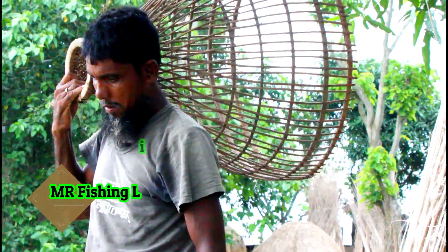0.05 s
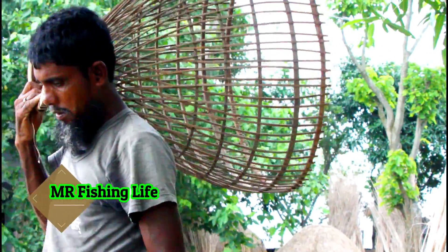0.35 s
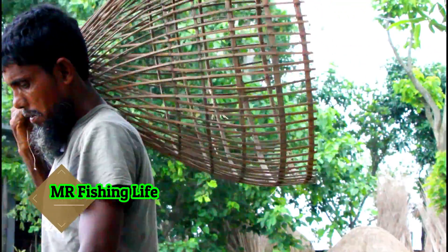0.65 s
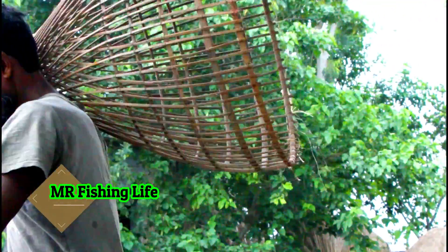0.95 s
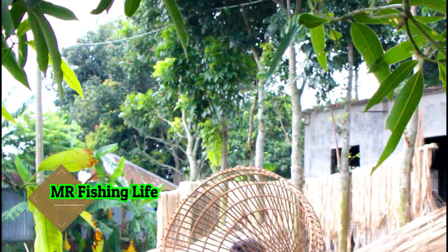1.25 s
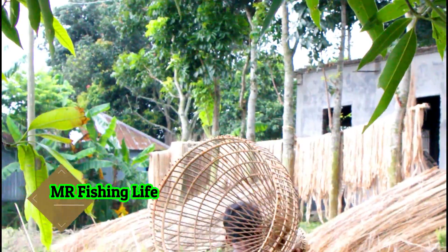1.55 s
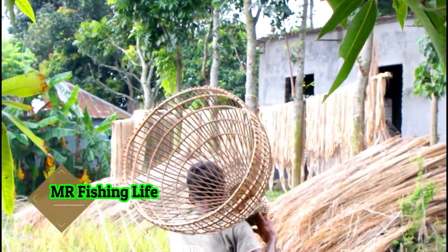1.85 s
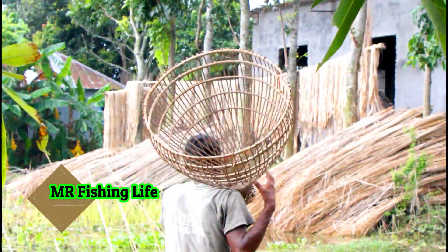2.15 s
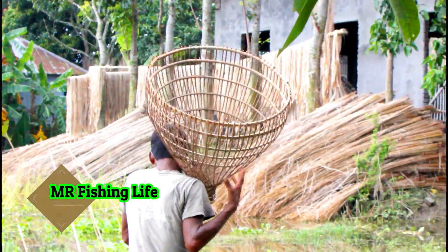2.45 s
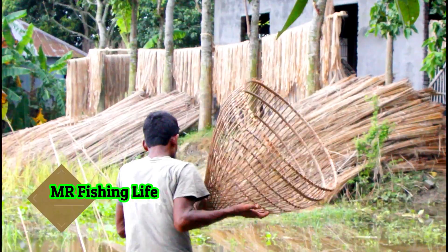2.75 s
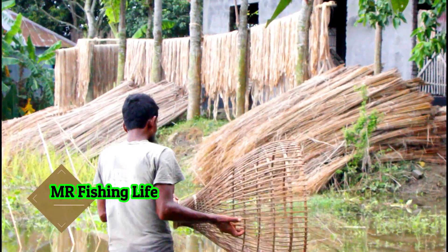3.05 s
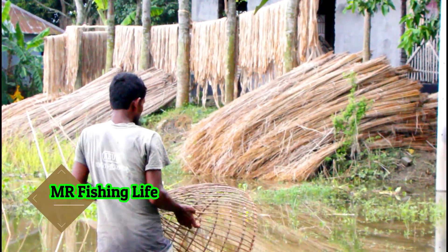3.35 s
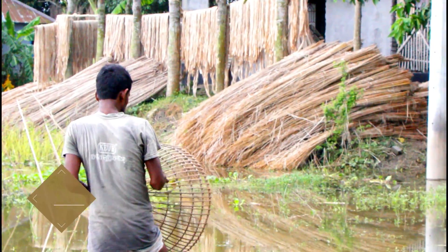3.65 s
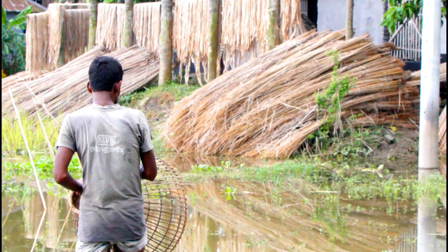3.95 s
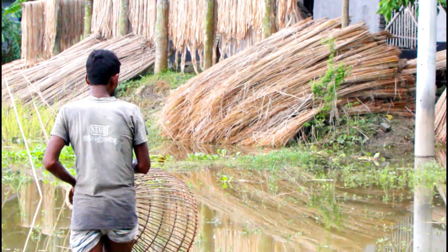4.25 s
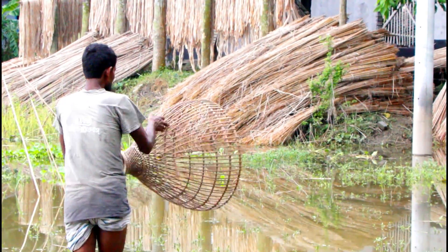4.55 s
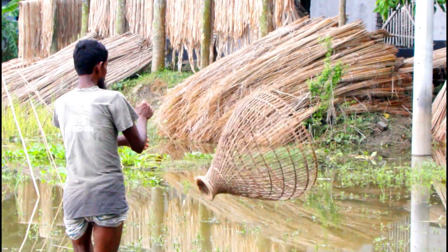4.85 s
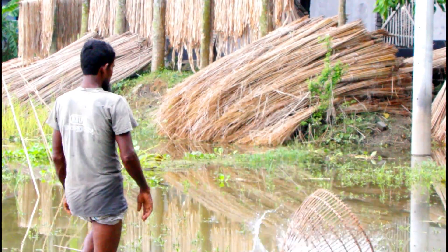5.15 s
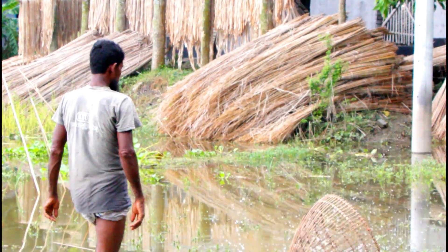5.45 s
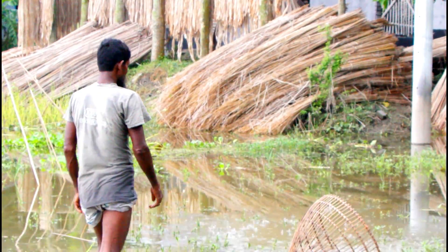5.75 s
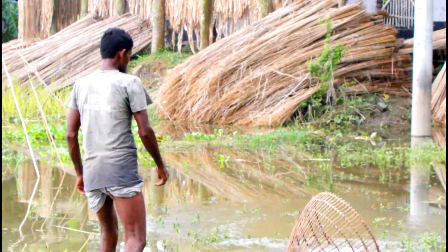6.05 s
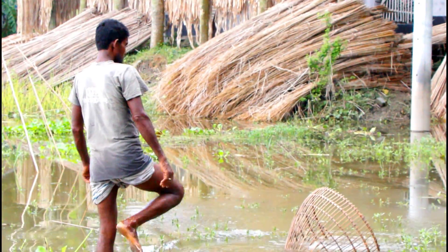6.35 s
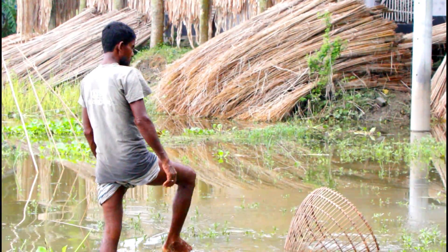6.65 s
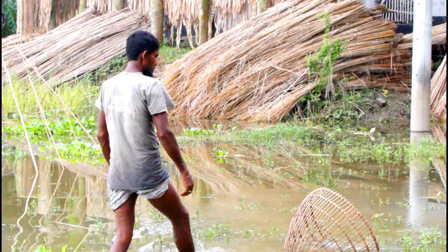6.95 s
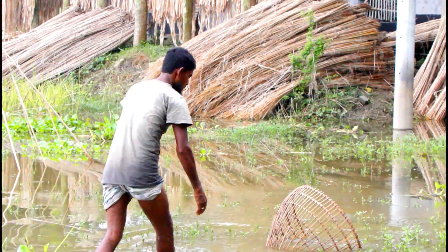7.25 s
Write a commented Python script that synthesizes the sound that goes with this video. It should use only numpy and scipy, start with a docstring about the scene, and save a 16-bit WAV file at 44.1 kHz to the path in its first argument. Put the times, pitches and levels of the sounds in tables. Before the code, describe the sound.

Legs slosh through shallow water and a bamboo fish trap lands with a broad splash, while a crow caws and small birds whistle.

```python
"""Fish trap in shallow floodwater

In front of the microphone a man wades in, legs sloshing and shedding bubbles, spray hissing, with one
sharp snap early on. He throws a bamboo fish trap, which lands with a broad splash. Some way off a crow
caws four times and small birds whistle; trees and house walls scatter the calls back."""
import sys
import numpy as np
from scipy import signal
from scipy.fft import rfft, irfft
from scipy.io import wavfile
from scipy.ndimage import uniform_filter1d, map_coordinates

SR = 44100
rng = np.random.default_rng(int(sys.argv[2]) if len(sys.argv) > 2 else 0)


def waveform_to_disk(signal):
    """Save audio, clipped to [-1, 1], as 16-bit WAV at the path in sys.argv[1]."""
    frames = np.transpose(np.atleast_2d(signal))
    scaled = np.clip(frames, -1, 1) * 32767
    samples = np.round(scaled).astype(np.int16)
    wavfile.write(sys.argv[1], SR, samples)


N = 326340
TIME = np.arange(N) / SR

# The trap's splash: the rim slaps, the cavity collapses, it gulps shut, thrown water rains back.
# Each row: start, rise, hold and fall in seconds, then relative body, gulp and spray levels in dB.
SPLASH_STAGES = [(5.13, 0.027, 0.008, 0.04, -40.5, -76, -61),
                 (5.215, 0.069, 0.17, 0.084, -44.5, -48, -57.5),
                 (5.337, .03, 0.0092, 0.015, -55, -47, -60.5), (5.464, 0.11, 0.032, 0.051, -45, -56, -53)]
# Spectra of moving water. Each row: frequency in Hz, level in dB.
SPLASH_BODY_SPECTRUM = [(350, -36.5), (650, -31.5), (950, 4), (1500, 1.5), (2000, 4), (2800, -4.5),
                        (4200, -8.5), (6000, -18.5), (10000, -21.5)]
GULP_SPECTRUM = [(60, -15.5), (150, -21.5), (280, -12.5), (450, -13.5), (650, -0.5), (900, 4), (1200, -6.5),
                 (1800, -37)]
SLOSH_SPECTRUM = [(200, -21.5), (450, -26), (700, -11.5), (1050, 2), (1500, -1.5), (2000, -7.5), (2900, -9),
                  (4800, -23.5), (7000, -20), (11000, -33.5), (17000, -41)]
SPRAY_SPECTRUM = [(1200, -30.5), (2200, -10.5), (3000, 4.5), (4200, 2.5), (5600, 4.5), (7200, -2.5),
                  (10000, -13.5), (14000, -19), (18000, -25)]
MIST_SPECTRUM = [(3000, -19), (5000, -7), (6500, 2), (9000, -0.5), (13000, -3), (18000, -10.5)]
# A leg pushes water. Each row: start in seconds, relative level in dB, hold and settling in seconds.
STRIDE_PUSHES = [(0.745, -71.5, .01, 0.033), (1.135, -61.5, .02, 0.039), (1.212, -57, .07, 0.03),
                 (1.323, -62.5, .06, .025), (1.885, -61, .02, .04), (1.968, -61, .03, 0.12),
                 (2.356, -65.5, .005, 0.026), (3.21, -56.5, .27, .035), (3.97, -57, 0.15, 0.02),
                 (4.864, -67, .02, .1), (5.883, -72, .01, 0.022), (6.218, -68.5, .12, 0.018),
                 (6.462, -73.5, .01, 0.036)]
# The hollow gulp of a foot sinking in. Each row: start in seconds, level in dB.
FOOT_GULPS = [(3.211, -27)]
# The course of that gulp. Each row: age in seconds, pitch in Hz, relative level in dB.
FOOT_CONTOUR = [(0, 604, -30), (.006, 814, -19.5), (.01, 1140, -8), (0.016, 1050, -22), (0.034, 886, -47.5)]
# Larger single bubbles. Each row: start in seconds, peak in dB, starting pitch in Hz.
BIG_BUBBLES = [(1.225, -42, 1260), (1.244, -37, 2750), (1.259, -42, 1900), (1.273, -44.5, 1152),
               (1.286, -45.5, 1620), (1.375, -42.5, 1083), (1.973, -45.5, 1108), (2.031, -47.5, 1270),
               (2.179, -51.5, 1240), (2.222, -45, 1820), (2.32, -47.5, 1606), (2.514, -36, 1530),
               (3.242, -37.5, 1320), (3.293, -44, 1030), (3.332, -45.5, 976), (3.358, -53.5, 660),
               (3.402, -47.5, 1010), (3.466, -44.5, 1260), (3.484, -40, 1450), (3.485, -40, 2940),
               (4.001, -41, 1030), (4.089, -48.5, 1030), (4.114, -44.5, 946), (4.116, -48.5, 2370),
               (4.569, -52, 2514), (5.05, -45, 2340), (5.418, -30.5, 2140), (5.701, -41, 1083),
               (6.232, -43, 2220), (6.278, -51, 2110), (6.333, -54.5, 1220), (6.482, -49, 2090)]
# Sheets of spray. Each row: start in seconds, level in dB, rise and fall in seconds, mist share in dB.
SPRAY_SHEETS = [(0.771, -62, 0.027, 0.039, 1), (1.151, -65, 0.036, 0.057, -24),
                (1.225, -66, 0.062, 0.029, -28), (1.412, -72.5, 0.0081, 0.026, -19),
                (1.946, -64, 0.065, .13, -9.5), (2.367, -51, 0.004, 0.016, -3),
                (3.219, -73, 0.0036, 0.19, -0.5), (3.476, -66, 0.0034, 0.079, -15),
                (3.94, -72.5, 0.0078, 0.12, -0.5), (4.402, -80, 0.0047, 0.06, 14),
                (4.82, -78.5, 0.048, 0.099, 0.5), (5.125, -38.5, 0.02, 0.028, -7),
                (5.821, -46, 0.0021, 0.03, 0), (6.222, -67.5, .008, 0.063, -26),
                (6.475, -62, 0.024, 0.057, -19)]
# Single drops striking the water. Each row: start in seconds, level in dB, pitch in Hz.
DROPS = [(1.225, -45, 4350), (1.365, -48.5, 2990), (1.404, -56.5, 3400), (1.893, -47, 4180),
         (2.197, -52.5, 3900), (2.37, -41.5, 5220), (2.417, -50, 4600), (3.39, -54, 4500),
         (3.414, -52.5, 4630), (3.619, -52, 7300), (4.034, -58.5, 3900), (5.824, -43, 3000),
         (6.131, -57.5, 2200), (6.931, -55.5, 6250)]
# A drop's spectrum. Each row: multiple of its pitch, level in dB.
DROP_SPECTRUM = [(.3, -28), (.8, -14), (1, 0), (1.2, -14), (2.5, -38)]
# The snap and its quick rebounds. Each row: start in seconds, relative level in dB.
SNAP_HITS = [(1.1422, -2.5), (1.1447, -11), (1.1464, -12), (1.1491, -23)]
# What the snap rings with. Each row: frequency in Hz, relative level in dB, seconds to fall 60 dB.
SNAP_RESONANCES = [(1610, -36, 0.0081), (2298, -7, 0.00852), (2590, -2.5, 0.007), (4300, -6, 0.003),
                   (5455, -16.5, 0.0028), (8724, -33, 0.0029)]

# The crow's calls. Each row: start and length in seconds, relative level and crescendo in dB, throat
# resonance at the start and at the top of its arch in Hz, seconds to that top, resonance at the end in
# Hz, pulse rate in Hz with the throat at rest, period jitter as a fraction, beak and clear tones in dB.
CROW_CALLS = [(0.241, 0.44, -45, -2.5, 1558, 1917, .12, 1868, 87.96, 0.09, -21, -14.5),
              (1.575, 0.39, -51, 7, 1660, 1825, .15, 1741, 150.6, 0.04, -30.5, -26.5),
              (2.451, 0.4, -48.5, -0.5, 1530, 1856, .26, 1855, 159.5, .08, -26.5, -33),
              (3.684, 0.38, -46, 1, 1808, 1870, 0.11, 1836, 142.1, 0.09, -23.5, -42)]
# The crow's throat at rest and the beak's upper resonances. Each row: frequency in Hz, level in dB.
THROAT_SPECTRUM = [(300, -45), (600, -37.5), (950, -16), (1350, -6.5), (1650, -3), (1850, 10.5), (2100, 4),
                   (2400, -12.5), (3100, -57.5), (4000, -74)]
BEAK_SPECTRUM = [(3000, -20.5), (3700, -30), (4400, 3.5), (5300, -8), (6400, -2), (7800, -13), (9000, -23),
                 (12000, -29.5)]
# Clear tones under a caw. Each row: multiple of the base pitch, relative level in dB.
CLEAR_TONES = [(0.998, 1), (1.075, -4), (1.409, -2), (1.7, -8)]
# A dull, low swell during the first caw. Each row: frequency in Hz, level in dB.
LOW_SWELL_SPECTRUM = [(50, -18), (80, -1), (160, -2), (300, -6), (480, 7), (750, 5), (1200, -4)]
# A two-note song. Each row: start in seconds, relative level of the falling note in dB, seconds until
# the rising note, its relative level in dB.
SONG_PHRASES = [(0.091, -56, .22, -47), (0.466, -48.5, 0.24, -48.5), (0.854, -52.5, 0.23, -49),
                (4.492, -59.5, 0.23, -55), (4.871, -52.5, 0.2, -50.5), (5.243, -53, 0.24, -46),
                (5.599, -47, 0.25, -50), (5.983, -50, .216, -50.5), (6.334, -49, 0.23, -51.5),
                (6.703, -52.5, 0.24, -54), (7.078, -56, 0.25, -55.5)]
# Arched chips, and hoarse chirps from further off. Each row: start in seconds, relative level in dB.
CHIPS = [(4.948, -51), (5.425, -43), (5.578, -43), (5.864, -45), (6.018, -45), (6.302, -45), (6.452, -44),
         (6.725, -46), (6.876, -48), (7.175, -54.5), (7.339, -51)]
DISTANT_CHIRPS = [(1.16, -50), (1.485, -62.5), (1.832, -53), (2.14, -54.5), (2.468, -54.5), (2.775, -56.5)]
# The course of each bird note. Each row: age in seconds, pitch in Hz, relative level in dB.
FALL_CONTOUR = [(0, 3740, -15), (.006, 3230, -5.5), (0.021, 3005, -4), (0.029, 2900, 0.5),
                (0.045, 2640, -6), (0.064, 2500, -20), (0.101, 2110, -21), (0.114, 1970, -45)]
RISE_CONTOUR = [(0, 3600, -17), (.008, 4250, -4), (.016, 4850, 0), (.024, 5350, -4), (.032, 5450, -11),
                (.05, 4600, -30)]
CHIP_CONTOUR = [(0, 2500, -11), (.008, 2900, -5), (.016, 3550, -3), (.024, 3950, -2), (.032, 3900, -2),
                (.041, 3550, -4), (.062, 2200, -20)]
DISTANT_CONTOUR = [(0, 3330, -8), (.015, 3446, -8), (0.034, 3882, -2.5), (.05, 4200, -7.5),
                   (0.062, 4365, -7)]
# Spectra of a soft click, the open air and an insect. Each row: frequency in Hz, level in dB.
CLICK_SPECTRUM = [(30, 10.5), (150, -0.5), (500, -12), (2000, 2), (6000, -6.5), (16000, -25)]
AIR_SPECTRUM = [(18, -39), (30, -3.5), (102, 2.5), (208, -5.5), (705, -2.5), (1200, -6.5), (1780, -10),
                (2520, -13.5), (3750, -14.5), (5290, -18.5), (9240, -12), (17000, -14.5)]
INSECT_SPECTRUM = [(8000, -33.5), (8800, -7), (9250, 2), (9700, -12), (10500, -25)]

THROAT_REST_HZ, CAW_ATTACK_S, CAW_RELEASE_S = 1850, 0.1, 0.15


def trap_splash():
    """The rim slaps the surface, the cavity gulps shut and the thrown water rains back."""
    stages = np.array([envelope(*row[:4]) for row in SPLASH_STAGES])
    body, gulp, spray = undb(np.array(SPLASH_STAGES)[:, 4:]).T @ stages
    churn = colour(froth(cycles=5, spread_db=3.5, crackle_db=3, count=10000), SPLASH_BODY_SPECTRUM)
    gurgle = colour(froth(cycles=9, spread_db=4.5, crackle_db=-4, count=3500), GULP_SPECTRUM)
    rain = undb(0.5) * colour(patter(6400, spread_db=1), SPRAY_SPECTRUM)
    return body * churn + gulp * gurgle + spray * rain


def wading():
    """Each stride folds air into the water, and one foot gulps as it sinks in."""
    sag_db_per_s = 32.5  # a push weakens as the leg slows
    push = np.zeros(N)
    for start, db, hold, settle in STRIDE_PUSHES:
        sag_db = sag_db_per_s * np.clip(TIME - start, 0, hold)
        push += undb(db - sag_db) * envelope(start, rise=0.013, hold=hold, fall=settle)
    bubbles = froth(cycles=12, spread_db=6, crackle_db=0.5, count=5000)
    slosh = undb(1.5) * push * colour(bubbles, SLOSH_SPECTRUM)
    return slosh + glides(FOOT_GULPS, FOOT_CONTOUR, waver=0.12, flutter_db=1)


def plops():
    """Larger single bubbles ring for about the same time whatever their size, each with a spatter."""
    out, t = np.zeros(N), TIME[:SR // 10]
    ring_s = 0.003
    spatter_gain = np.exp(-t / 0.0095) * np.minimum(t / 0.0014, 1)
    for start, db, hz in BIG_BUBBLES:
        spatter = spatter_gain * colour(rng.standard_normal(len(t)), SLOSH_SPECTRUM)
        add(out, start - 0.001, undb(db) * bubble(hz, cycles=ring_s * hz, glide=0.1, onset=2.2))
        add(out, start, undb(db - 20) * spatter)
    return out


def sprays():
    """Sheets of small droplets burst up in clumps and thin out."""
    clumps = undb(2.5 * walk(90, N))
    coarse = colour(patter(4000, spread_db=3.8) * clumps, SPRAY_SPECTRUM)
    mist = colour(patter(3000, spread_db=2.9) * clumps, MIST_SPECTRUM)
    return sum(undb(db) * envelope(start, rise, 0, fall) * (coarse + undb(mist_db) * mist)
               for start, db, rise, fall, mist_db in SPRAY_SHEETS)


def drop_ticks():
    """Single drops strike the water: each a tiny burst of noise around one pitch."""
    out, t = np.zeros(N), TIME[:SR // 20]
    rise_s, fall_s = 0.0015, 0.0032
    gain = np.minimum(t / rise_s, 1) ** 2 * np.exp((rise_s - t) / fall_s)
    for start, db, hz in DROPS:
        spectrum = [(hz * ratio, band_db) for ratio, band_db in DROP_SPECTRUM]
        add(out, start, undb(db) * gain * colour(rng.standard_normal(len(t)), spectrum))
    return out


def froth(cycles, spread_db, crackle_db, count):
    """A cloud of bubbles of all sizes among bursting droplets."""
    cloud = np.zeros(N)
    for when, pitch_draw, level_draw in rng.random((count, 3)):
        hz = 330 * 13 ** pitch_draw
        gain = hz * undb(-spread_db * np.log(level_draw + 0.054))
        add(cloud, when * N / SR, gain * bubble(hz, cycles, glide=0.14, onset=0.71))
    return unit(cloud) + undb(crackle_db) * patter(2300, spread_db=1.8)


def bubble(hz, cycles, glide, onset):
    """A bubble swells over `onset` cycles, rings down and rises in pitch."""
    turns = np.arange(int(4 * cycles * SR / hz) + 2) * hz / SR
    ring = np.exp(-turns / cycles) * (1 - np.exp(-(turns / onset) ** 2))
    return ring / ring.max() * np.sin(2 * np.pi * turns * (1 + glide * turns / (8 * cycles)))


def patter(per_second, spread_db):
    """Tiny impacts of unequal size, as of droplets, each with a brief fizz."""
    hits = rng.random(N) < per_second / SR
    impacts = hits * undb(spread_db * np.minimum(rng.exponential(size=N), 4))
    fizz_gain = signal.lfilter([1], [1, -np.exp(-1 / (0.00024 * SR))], impacts)
    return unit(fizz_gain * rng.standard_normal(N))


def snap():
    """A hard, dry snap, perhaps of bamboo, rings for a few milliseconds; too small to radiate bass."""
    out, t = np.zeros(N), TIME[:SR // 20]
    ring = sum(undb(db) * np.sin(2 * np.pi * hz * t) * np.exp(-np.log(1000) * t / t60)
               for hz, db, t60 in SNAP_RESONANCES)
    for start, db in SNAP_HITS:
        add(out, start, undb(db) * ring * (1 - np.exp(-t / 0.00038)))
    return signal.sosfilt(signal.butter(2, [1000, 11000], "band", fs=SR, output="sos"), out)


def click():
    """A soft, full-range click just before the snap."""
    gain = undb(-48.5) * envelope(1.119, rise=0.00038, hold=0.00061, fall=0.00078)
    return gain * colour(rng.standard_normal(N), CLICK_SPECTRUM)


def crow():
    """Four caws from a tree some way off, more echo than direct sound at the microphone."""
    direct = np.zeros(N)
    for start, *settings in CROW_CALLS:
        add(direct, start, caw(*settings))
    return undb(-5.5) * direct + undb(2.5) * scatter(direct, t60=0.13, gap=0.004, patchy_db=3.26)


def caw(length, db, crescendo_db, start_hz, top_hz, top_s, end_hz, pulse_hz, jitter, beak_db, tone_db):
    """The crow's effort builds, holds and lets go; pitch and resonances arch together with the throat."""
    voice = crow_voice(pulse_hz, jitter, beak_db, tone_db)
    age = TIME[:SR // 2]
    starting = np.maximum(1 - age / CAW_ATTACK_S, 0) ** 2
    ending = np.maximum(1 + (age - length) / CAW_RELEASE_S, 0) ** 2
    held = np.clip((age - CAW_ATTACK_S) / (length - CAW_ATTACK_S - CAW_RELEASE_S), 0, 1)
    effort_db = db + crescendo_db * (held - 0.5) - 19 * starting - 25.5 * ending
    before_top = np.maximum(1 - age / top_s, 0)
    after_top = np.clip((age - top_s) / (length - top_s), 0, 1)
    throat_hz = top_hz + (start_hz - top_hz) * before_top ** 2 + (end_hz - top_hz) * after_top
    arched = map_coordinates(voice, [np.cumsum(throat_hz / THROAT_REST_HZ)], order=3)
    return undb(effort_db) * np.minimum(age / 0.03, 1) * unit(arched)


def crow_voice(pulse_hz, jitter, beak_db, tone_db):
    """Harsh, uneven pulses ring the crow's throat, over clear low tones that sag."""
    age, t = TIME[:SR], TIME[:SR // 40]
    timing, strength = rng.standard_normal((200, 2)).T
    at = (np.cumsum(np.abs(1 + jitter * timing)) * SR / pulse_hz).astype(int)
    inside = at < SR
    pulses = np.zeros(SR)
    pulses[at[inside]] = undb(4.5 * np.clip(strength[inside], -1.5, 1.5))
    # the membranes stay open for a few milliseconds and let rasping air through
    opening = t * np.exp(-t / 0.0013)
    airflow = signal.lfilter(opening, 1, pulses)
    rasp = unit(airflow * rng.standard_normal(SR))
    ring = unit(signal.lfilter(opening * np.sin(2 * np.pi * THROAT_REST_HZ * t), 1, pulses))
    throat = ring + undb(-3.5) * colour(rasp + 0.5 * unit(pulses), THROAT_SPECTRUM)
    # the upper resonances come in as the beak opens
    beak = np.minimum(age / CAW_ATTACK_S, 1) ** 2 * colour(rasp, BEAK_SPECTRUM)
    turns = np.cumsum(np.interp(age, [0, 0.17, 0.36], [890, 895, 820])) / SR
    tones = sum(undb(db) * np.sin(2 * np.pi * ratio * turns) for ratio, db in CLEAR_TONES)
    return throat + undb(beak_db - 1) * beak + undb(tone_db) * tones


def low_swell():
    """A dull, low swell during the first caw: faint at first, then briefly louder."""
    lead_in = undb(-85) * envelope(0.27, rise=0.051, hold=0.24, fall=0.05)
    peak = undb(-61) * envelope(0.506, rise=0.068, hold=0.03, fall=0.03)
    return (lead_in + peak) * colour(patter(2500, spread_db=2.8), LOW_SWELL_SPECTRUM)


def small_birds():
    """One bird alternates falling and rising notes, another chips, a third rasps deep in the trees."""
    falling_notes = [(start, db) for start, db, _, _ in SONG_PHRASES]
    rising_notes = [(start + delay, db) for start, _, delay, db in SONG_PHRASES]
    falls = glides(falling_notes, FALL_CONTOUR, waver=0.027, flutter_db=2.5)
    rises = glides(rising_notes, RISE_CONTOUR, waver=0.035, flutter_db=3)
    chips = glides(CHIPS, CHIP_CONTOUR, waver=0.055, flutter_db=3.5, waver_hz=800)
    distant = glides(DISTANT_CHIRPS, DISTANT_CONTOUR, waver=0.11, flutter_db=4, waver_hz=1100)
    direct = undb(-1.5) * falls + undb(-7) * rises + undb(-3) * chips
    into_trees = undb(-7.5) * falls + undb(-5.5) * (rises + chips) + undb(-1) * distant
    early = scatter(into_trees, t60=0.2, gap=0.0043, patchy_db=1.6)
    late_low = scatter(undb(-6.5) * falls, t60=0.48, gap=0.011, patchy_db=3.5)
    # leaves swallow more of the higher notes
    high_notes = undb(-13.5) * rises + undb(-15) * chips + undb(-22) * distant
    late_high = scatter(high_notes, t60=0.48, gap=0.018, patchy_db=5)
    return direct + early + late_low + late_high


def glides(calls, contour, waver, flutter_db, waver_hz=450):
    """Gliding tones that waver in pitch and strength, each its own way; fast wavering sounds hoarse."""
    ages, hz, db = np.transpose(contour)
    t = np.arange(int(ages[-1] * SR)) / SR
    smooth_hz = uniform_filter1d(np.interp(t, ages, hz), size=200)
    fade = signal.windows.tukey(len(t), 0.1)
    out = np.zeros(N)
    for start, call_db in calls:
        pitch = smooth_hz * (1 + waver * walk(waver_hz, len(t)))
        gain = fade * undb(call_db + np.interp(t, ages, db) + flutter_db * walk(320, len(t)))
        add(out, start, np.sqrt(2) * gain * np.sin(2 * np.pi * np.cumsum(pitch) / SR))
    return out


def insect():
    """A thin, uneven trill runs faintly throughout and swells once."""
    trill = colour(rng.standard_normal(N), INSECT_SPECTRUM) * undb(2.6 * walk(27, N))
    effort = undb(-103) + undb(-87) * envelope(3.6, rise=0.69, hold=0.37, fall=0.3)
    return effort * trill


def open_air():
    """Very quiet open air that wavers and slowly grows quieter."""
    level_db = -85.5 - 0.43 * TIME + walk(2.6, N)
    return undb(level_db) * colour(rng.standard_normal(N), AIR_SPECTRUM)


def scatter(x, t60, gap, patchy_db):
    """Many unequal echoes from trunks, leaves and walls, setting in after `gap` seconds."""
    t = TIME[:SR]
    echoes = rng.standard_normal(SR) * undb(patchy_db * rng.standard_normal(SR))
    echoes *= np.exp(-np.log(1000) * t / t60) * np.clip(t / gap - 1, 0, 1)
    return signal.fftconvolve(x, echoes / np.sqrt(np.sum(echoes ** 2)))[:N]


def envelope(start, rise, hold, fall):
    """Gain that rises, holds and dies away with the time constant `fall`, all in seconds."""
    t = np.maximum(TIME - start, 0)
    return np.minimum(t / rise, 1) * np.exp(-np.maximum(t - rise - hold, 0) / fall)


def colour(x, spectrum):
    """Filter x by (Hz, dB) points, falling 21 dB an octave beyond them, and scale to rms 1."""
    hz, db = np.transpose(spectrum)
    f = np.arange(len(x) // 2 + 1) * SR / len(x) + 1
    octaves_beyond = np.maximum(np.log2(hz[0] / f), 0) + np.maximum(np.log2(f / hz[-1]), 0)
    gain = undb(np.interp(np.log(f), np.log(hz), db) - 21 * octaves_beyond)
    return unit(irfft(rfft(x) * gain, len(x)))


def walk(per_second, size):
    """A smooth random wander with a spread near 1."""
    return np.interp(np.arange(size) * per_second / SR, np.arange(4096), rng.standard_normal(4096))


def add(out, start, x):
    """Mix x into out from `start` seconds."""
    i = max(int(start * SR), 0)
    out[i:i + len(x)] += x[:max(len(out) - i, 0)]


def unit(x):
    """Scale to rms 1."""
    return x / np.sqrt(np.mean(x ** 2) + 1e-20)


def undb(db):
    """Decibels to gain."""
    return 10 ** (np.asarray(db) / 20)


def scene():
    """Everything reaches the microphone from the front; only faint reflections differ left and right."""
    water = wading() + plops() + drop_ticks() + trap_splash() + sprays()
    swell, crack = low_swell(), snap()
    yard = scatter(undb(-8.5) * (water + swell) + undb(-28.5) * crack, t60=0.3, gap=0.0043, patchy_db=2.3)
    mid = water + swell + crack + click() + yard + crow() + small_birds() + insect() + open_air()
    side = undb(-43) * scatter(mid, t60=0.014, gap=0.00019, patchy_db=0)
    return np.array([mid + side, mid - side])


def record(dry):
    """The sound drops out for a moment after the click, and the recorder cuts the very top."""
    dropout = envelope(1.123, rise=0.001, hold=0.01, fall=0.001)
    top_cut = signal.ellip(10, 0.1, 70, 18200, fs=SR, output="sos")
    return signal.sosfilt(top_cut, dry * (1 - dropout))


dry = scene()
out = record(dry)
waveform_to_disk(out)
```